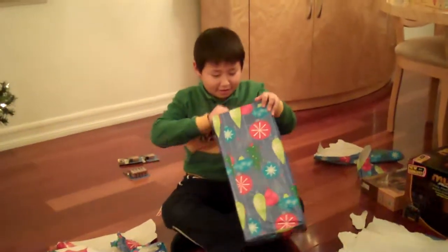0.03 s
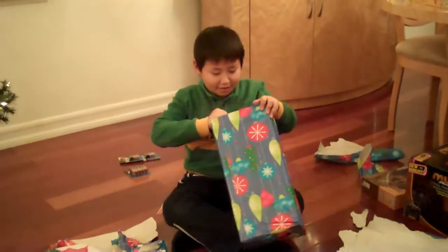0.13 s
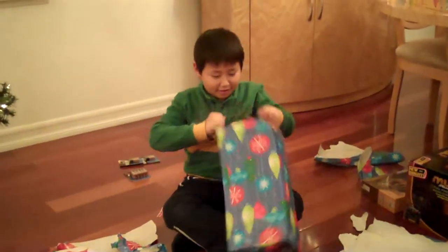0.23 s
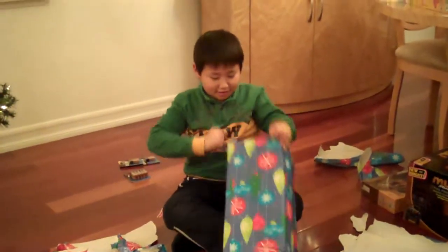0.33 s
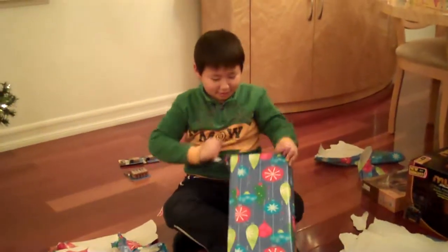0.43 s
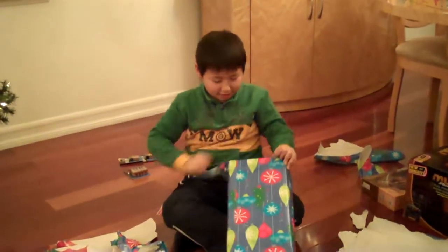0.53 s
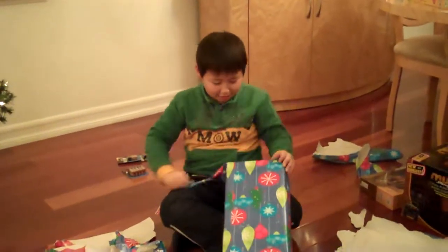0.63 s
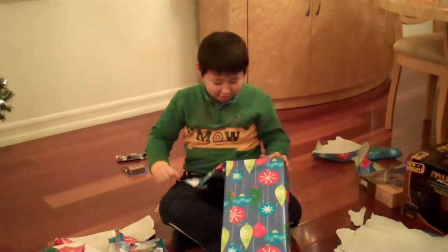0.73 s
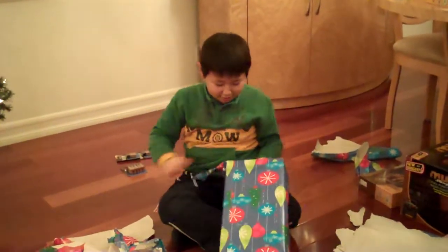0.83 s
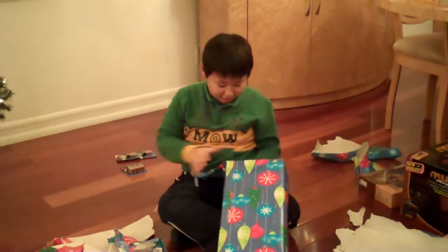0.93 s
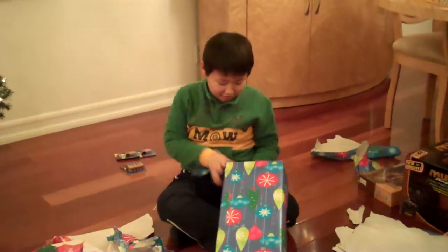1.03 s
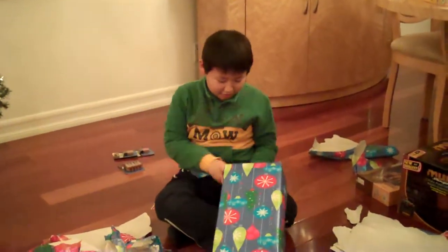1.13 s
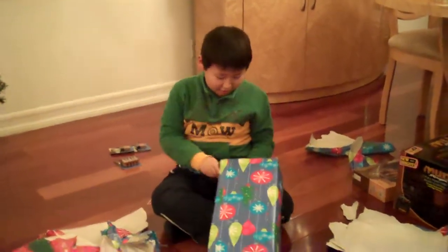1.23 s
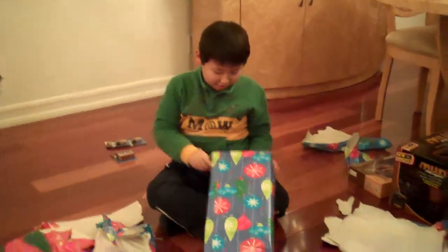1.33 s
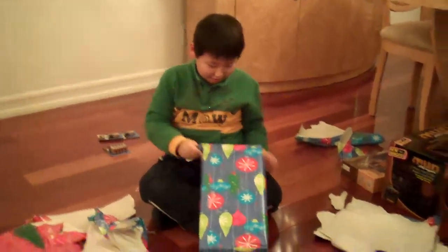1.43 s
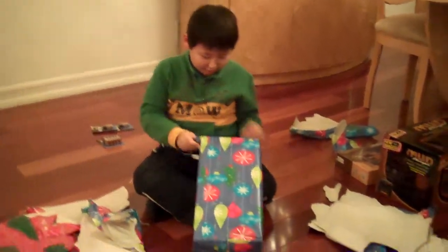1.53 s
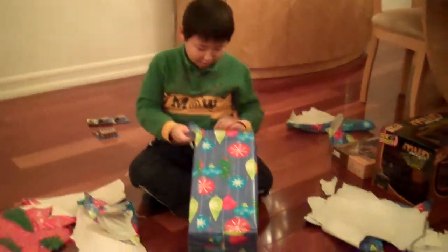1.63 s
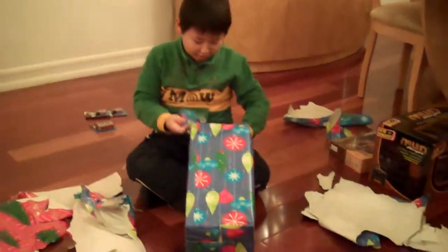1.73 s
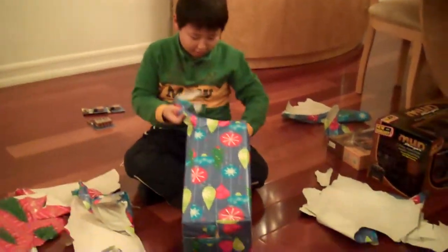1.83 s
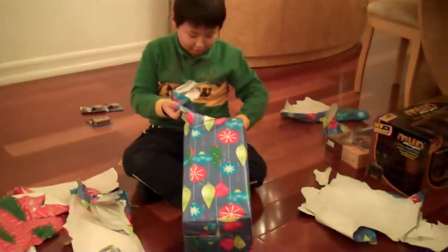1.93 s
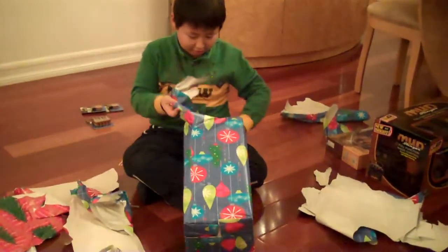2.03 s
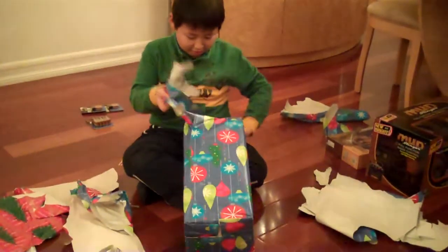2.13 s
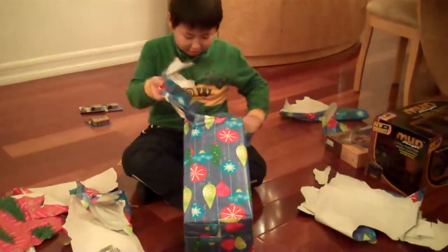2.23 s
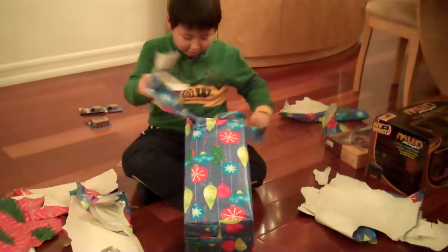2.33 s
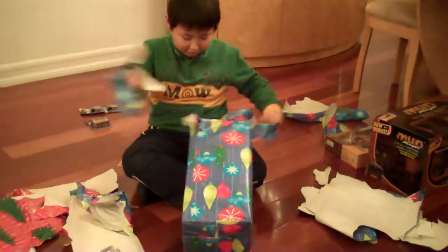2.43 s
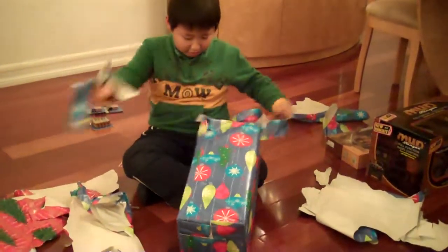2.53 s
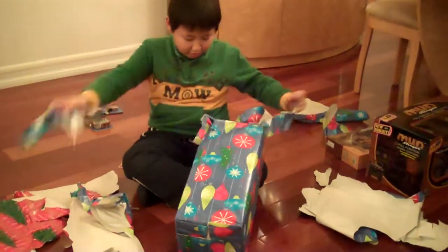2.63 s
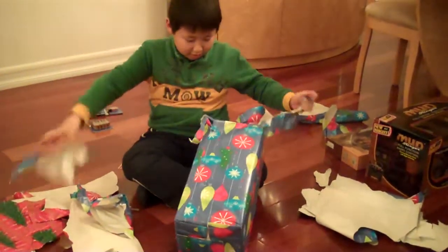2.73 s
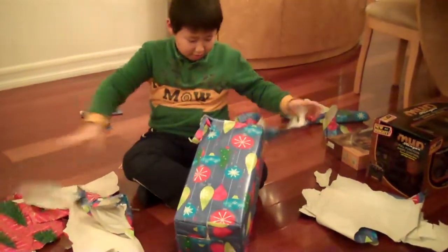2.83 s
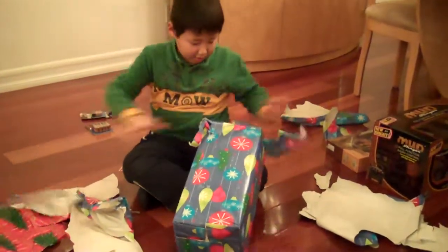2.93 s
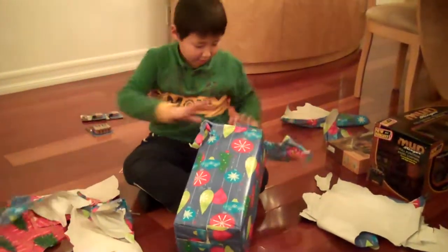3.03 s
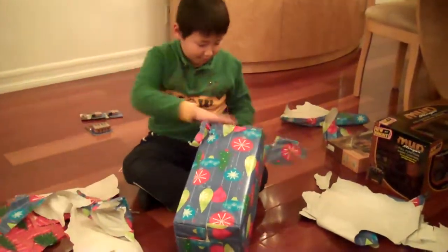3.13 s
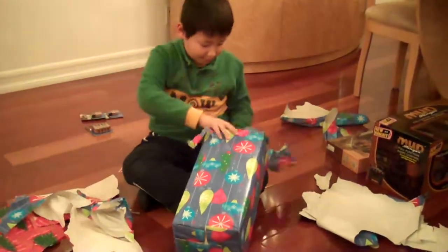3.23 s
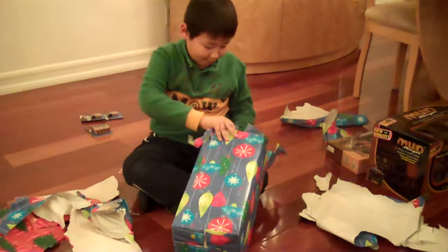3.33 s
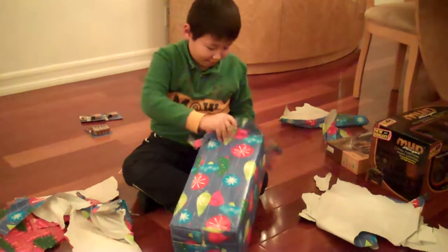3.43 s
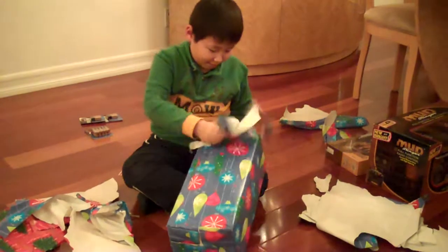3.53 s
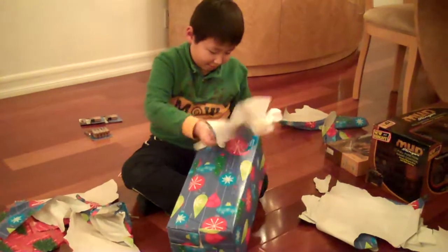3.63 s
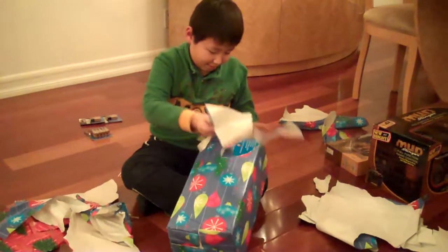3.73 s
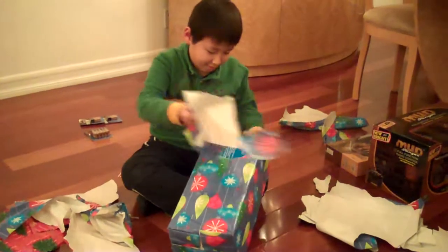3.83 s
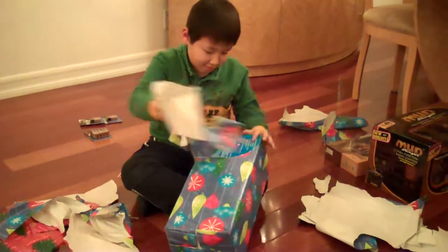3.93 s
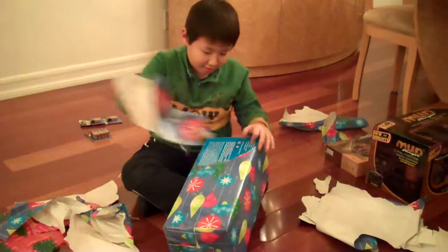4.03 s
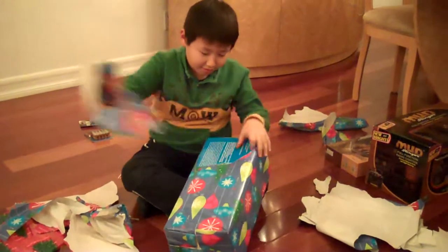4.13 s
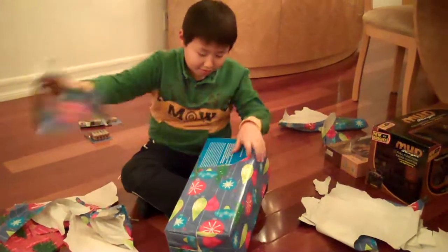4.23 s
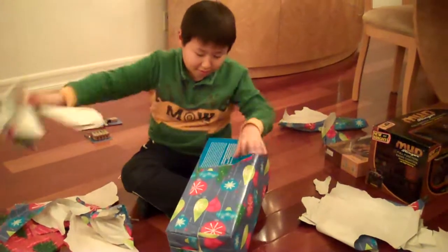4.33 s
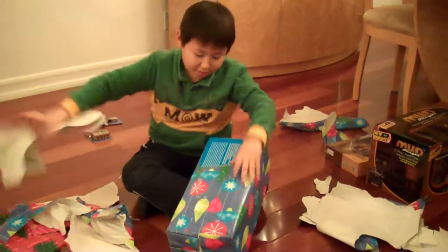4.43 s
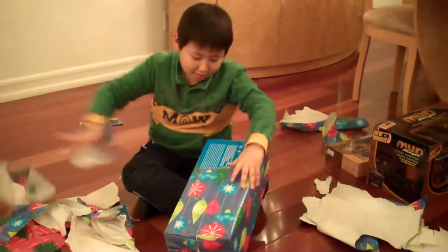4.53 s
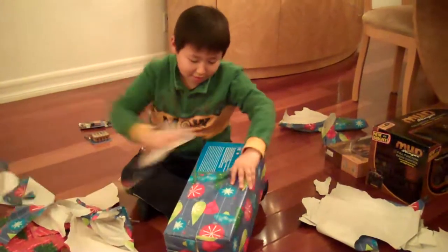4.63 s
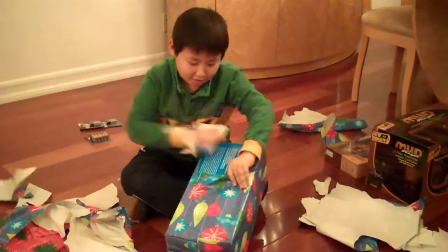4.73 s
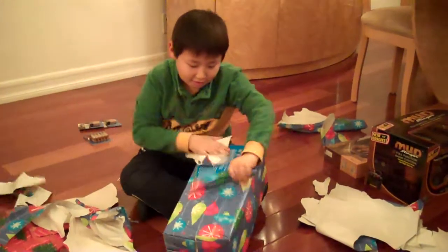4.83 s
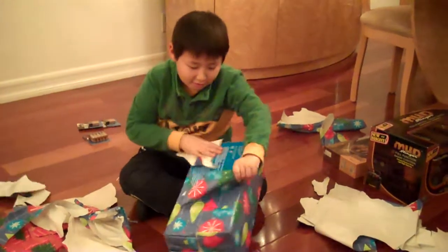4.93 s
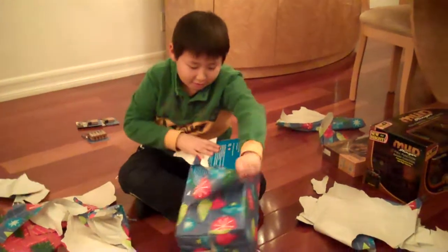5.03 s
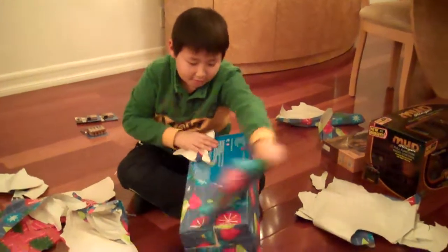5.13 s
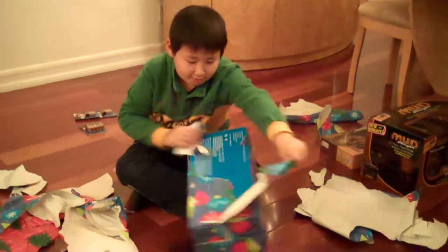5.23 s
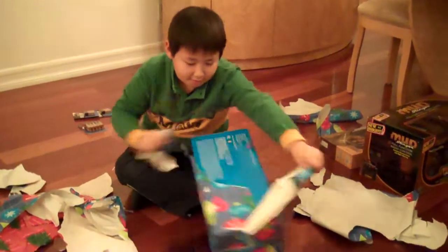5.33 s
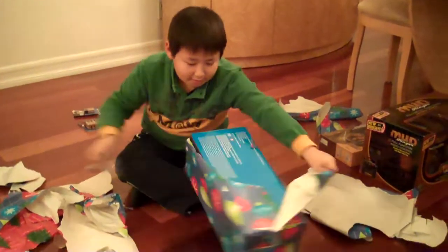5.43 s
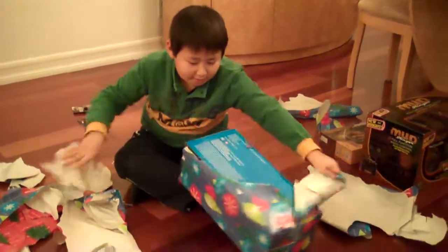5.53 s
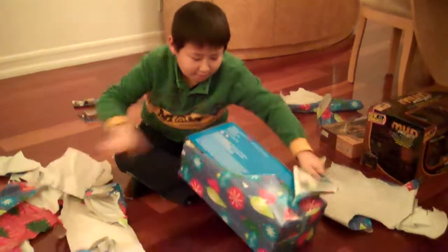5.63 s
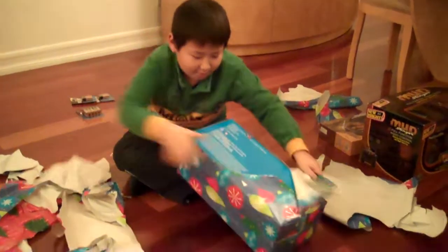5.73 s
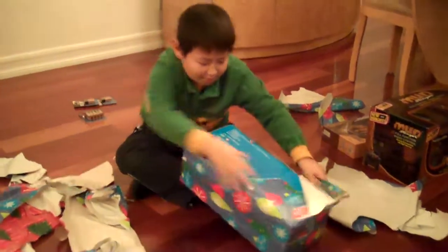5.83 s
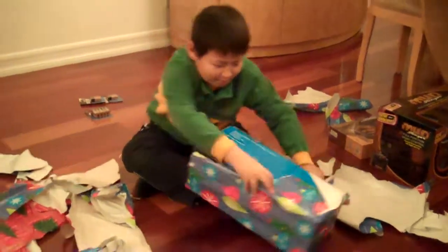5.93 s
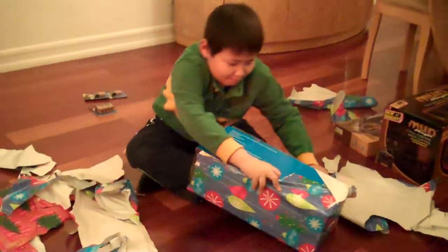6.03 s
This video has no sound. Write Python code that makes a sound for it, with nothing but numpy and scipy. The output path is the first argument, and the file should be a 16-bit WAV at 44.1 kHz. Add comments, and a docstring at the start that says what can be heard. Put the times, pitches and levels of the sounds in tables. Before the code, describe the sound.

Gift wrap is ripped off a cardboard box in sharp, crackling bursts, with paper crumpling and hollow box knocks in a room.

```python
"""In a room with a wooden floor, gift paper is torn off a cardboard box and crumpled by hand.
Tearing fibres are dense random impulses; creases and snaps are damped sines, the snaps with noisy bursts.
Rubbing and knocks excite resonances of the box, and knocks also thud into the boards.
A floor echo and decaying noise tails make the room; two microphone ports ring in the treble,
then quiet air is added and the recorder clips softly."""
import sys
import numpy as np
from scipy import signal
from scipy.fft import rfft, irfft, next_fast_len
from scipy.io import wavfile
from scipy.ndimage import map_coordinates

SR = 44100
rng = np.random.default_rng(int(sys.argv[2]) if len(sys.argv) > 2 else 0)


def transcribe(signal):
    """Save signal, clipped to [-1, 1], as a 16-bit WAV file at the path in sys.argv[1]."""
    frames = np.atleast_2d(signal).T
    limited = np.clip(frames, -1, 1)
    pcm = np.round(limited * 32767).astype(np.int16)
    wavfile.write(sys.argv[1], SR, pcm)


def boost(x):
    """Linear amplitude factor 10**(x/20) for a level x in decibels (scalar or array-like)."""
    u = np.asarray(x, float) / 20
    return 10 ** u


N = 268657  # samples

# spectral colour of parting fibres: f/Hz, relative level/dB
FIBRE_COLOUR = [(300, -68), (1500, -9.5), (3000, 3.5), (5000, 1.5), (8000, 3), (14000, 3)]


def along(points, hz):
    """Interpolation on a logarithmic frequency axis, between points of f/Hz and value."""
    f, v = np.transpose(points)
    return np.interp(np.log(hz + 1), np.log(f + 1), v)


def unit(x):
    """Normalisation of mean power: the rms becomes 1."""
    return x / np.sqrt(np.mean(x ** 2) + 1e-20)


def filtered(x, response):
    """Linear filtering: the spectrum is multiplied by a complex response of frequency."""
    m = next_fast_len(x.shape[-1] + 8192)
    spectrum = rfft(x, m) * response(np.fft.rfftfreq(m, 1 / SR))
    return irfft(spectrum, m)[..., :x.shape[-1]]


def causal(points):
    """Minimum phase: folding the cepstrum gives a short impulse response without pre-ring."""
    cepstrum = irfft(np.log(boost(along(points, np.fft.rfftfreq(2048, 1 / SR)))))
    folded = np.r_[cepstrum[0], 2 * cepstrum[1:1024], np.zeros(1024)]
    return irfft(np.exp(rfft(folded)))[:1024]


def wobble(rate):
    """Slow random modulation: a smooth curve through Gaussian knots, rate of them a second."""
    return map_coordinates(rng.standard_normal(N // 100), [np.arange(N) * rate / SR])


def ticks(count, spread_db, clump_db, clump_rate, scatter_db):
    """Crackling noise: clumped impulses, few large and many small, facing each port differently; rms 1."""
    when, size, sign = rng.random((count, 3)).T
    tail = np.minimum(-np.log(size + 1e-9), 5)  # the size is bounded, so that no single tick stands out
    size = boost(spread_db * tail) * np.sign(sign - .5)
    facing = boost(scatter_db * rng.standard_normal((2, count)))
    start = (when * N).astype(int)
    trains = np.array([np.bincount(start, size * f, N) for f in facing])
    return unit(trains * boost(clump_db * wobble(clump_rate)))


def coloured(train, points):
    """Convolution of impulses with a unit-energy kernel, which keeps the rms of random ticks."""
    kernel = causal(points)
    kernel = kernel / np.linalg.norm(kernel)
    return signal.fftconvolve(np.atleast_2d(train), kernel[None], axes=1)[:, :N]


def grains(start, size, hz, cycles):
    """Free decay of small resonators: damped sines summed, each falling by 1/e in the given cycles."""
    t = np.arange(128) / SR
    decay = np.exp(-hz[:, None] * t / cycles)
    rows = size[:, None] * np.sin(2 * np.pi * hz[:, None] * t) * decay
    return np.bincount((start[:, None] + np.arange(128)).ravel(), rows.ravel(), N + 128)[:N]


def handling(index):
    """Continuous excitation by hands that never quite rest: one column, a value per sample."""
    # t/s, relative loose rustle level/dB, creases over tearing/dB, relative box rubbing level/dB
    hands = [(0, -33.5, -9, -22.5), (.3, -32, -5, -25), (.47, -30, -2.5, -11.5), (.7, -31, -16, -22.5),
             (.88, -57, -16, -47), (1.04, -42.5, -6, -22.5), (1.22, -32, -0.5, -15),
             (1.52, -30, -9.5, -25.5), (1.75, -32, -7, -27), (2.12, -22, -9, -22), (2.4, -29, -9.5, -22.5),
             (2.72, -35.5, -1, -29), (2.89, -37, -15, -16.5), (3.0, -58, -10, -26), (3.074, -67, -18, -42),
             (3.086, -39.5, -1, -20), (3.42, -32.5, -3, -22), (3.7, -41, -6.5, -30.5), (4.03, -33, -7, -23),
             (4.42, -40.5, -2, -32), (4.6, -38.5, -6, -17), (4.9, -20, -7, -23), (5.2, -48, -8.5, -27),
             (5.41, -35, -2, -12.5), (5.74, -35, -5, -26), (5.86, -35, -4.5, -22), (6.09, -37, -2.5, -15)]
    columns = np.transpose(hands)
    return np.interp(np.arange(N) / SR, columns[0], columns[index])


def tearing():
    """Addition of incoherent powers: pulls and loose rustle give a relative tearing level in dB."""
    # pulls that swell, hold and let go: start t/s, rise t/s, hold t/s, fall t/s, relative level/dB
    pulls = [(-.03, 0.02, 0.0093, 0.22, -22.5), (0.167, 0.068, 0.035, 0.074, -23),
             (0.253, 0.065, 0.0055, 0.038, -12), (0.416, 0.023, .01, .06, -31.5),
             (0.548, 0.071, .005, 0.049, -19.5), (0.942, 0.021, 0.0093, .03, -35),
             (1.058, 0.026, .005, 0.14, -24), (1.234, .012, 0.038, 0.33, -24),
             (1.377, 0.013, 0.026, 0.15, -17), (1.576, 0.14, 0.13, 0.12, -19),
             (1.896, 0.045, 0.24, 0.064, -24), (2.083, 0.055, 0.0042, 0.12, -12),
             (2.231, 0.029, 0.092, 0.045, -18), (2.47, 0.049, .005, 0.43, -24.5),
             (2.625, 0.03, .005, 0.093, -19.5), (3.098, 0.083, .005, 0.34, -29.5),
             (3.433, 0.007, 0.29, 0.072, -20), (3.481, 0.0059, 0.013, 0.1, -9),
             (3.6, 0.013, .08, .04, -16.5), (3.751, 0.014, 0.248, .015, -19),
             (3.935, .02, 0.056, 0.012, -23.5), (4.448, .004, 0.0075, 0.0064, -26.5),
             (4.562, 0.026, 0.14, .02, -27.5), (4.775, 0.017, 0.069, .05, -15.5),
             (4.912, 0.14, 0.0043, 0.24, -14), (5.12, 0.029, .005, 0.076, -13),
             (5.245, 0.037, 0.0042, 0.089, -24), (5.398, 0.0071, 0.0059, 0.018, -28),
             (5.875, 0.0042, 0.023, 0.013, -20.5), (5.925, 0.044, .02, 0.17, -25.5),
             (6.04, 0.054, .05, .1, -29)]
    rise_db, fall_db = 17.5, 27  # covered in the rise and in the fall; the slopes continue beyond
    t = np.arange(0, N, 32) / SR
    power = boost(2 * handling(index=1)[::32])
    for start, *stages, db in pulls:
        rise, hold, fall = np.maximum(stages, .002)
        growth = rise_db * (t - start - rise) / rise
        release = fall_db * (start + rise + hold - t) / fall
        swell_db = np.minimum(growth, release)
        power = power + boost(2 * (db + np.clip(swell_db, -120, 0)))
    return np.interp(np.arange(N) / SR, t, 10 * np.log10(power))


def fibres(tear_db):
    """Brittle fracture as a dense impulse process: tearing fibres tick along the rip."""
    train = ticks(count=22000, spread_db=0.5, clump_db=2.0, clump_rate=90, scatter_db=3.0)
    return coloured(boost(tear_db - 11.5) * train, FIBRE_COLOUR)


def creases(tear_db):
    """Buckling: each small paper panel pops through its fold at its own pitch; the pops carry little below a
    few hundred hertz."""
    when, size = rng.random((15000, 2)).T
    start = (when * N).astype(int)
    level_db = tear_db + handling(index=2) - 11.5 + 2.57 * wobble(80)
    taut = boost(0.11 * (tear_db[start] + 28))  # harder pulling tightens the panels
    hz = np.clip(3300 * taut * np.exp(0.4 * rng.standard_normal(len(when))), 600, 9000)
    size_db = 3.33 * np.minimum(-np.log(size + 1e-9), 4)
    pops = grains(start, boost(level_db[start] + size_db), hz, cycles=0.9)
    return filtered(pops, lambda f: (1j * f / (1j * f + 450)) ** 2)


def cardboard(hz, upper):
    """Modal superposition: second-order box resonances of alternating sign, above or below 500 Hz."""
    # cardboard box modes: f/Hz, bandwidth f/Hz, relative level/dB
    modes = [(105, 31, -10.5), (223, 39.5, 0.5), (336, 100, -3.5), (548, 100, -3.5), (812, 92, -2),
             (1130, 1300, -10.5)]
    response = 0
    for k, (centre, width, db) in enumerate(modes):
        if (centre > 500) == upper:
            damping = 1j * hz * width
            response = response + (-1) ** k * boost(db) * damping / (centre ** 2 - hz * hz + damping)
    return response


def box(tear_db):
    """Forced and struck resonance: rubbing and knocks excite the box, and knocks thud into the floorboards."""
    # knocks: t/s, relative level/dB, upper modes relative level/dB, floor thud relative level/dB
    knocks = [(0.31, -23, -16, -20), (0.605, -26, 10, -33), (1.097, -42, 15, -24), (1.722, -21.5, 0.5, -28),
              (1.959, -40, 12, -25), (2.872, -32.5, 8, -33), (3.186, -29, -6, -13), (3.353, -27, 1, -16),
              (4.576, -35, 19, -32), (4.803, -31, 3, 0), (5.41, -17, 0, -11.5), (5.49, -22.5, 4, -19),
              (5.918, -23.5, -4, -14), (5.986, -27, 21.5, -36)]
    # a knocked box slides and chatters on for a moment
    shudder_db, shudder_upper_db, shudder_t60_s = -4, -10.5, 0.47
    rub_follows, rub_offset_db = 0.7, -8.5  # dB of rubbing per dB of tearing; relative level
    rub_db = handling(index=3) + rub_follows * tear_db + rub_offset_db
    rub = boost(rub_db) * ticks(count=6000, spread_db=2.2, clump_db=3.3, clump_rate=26, scatter_db=1.0)
    low, high, thud = np.zeros((3, N))
    fading = boost(-60 * np.arange(SR // 3) / SR / shudder_t60_s)
    chatter = fading * rng.standard_normal((len(knocks), SR // 3))
    for (s, db, upper_db, thud_db), after in zip(knocks, chatter):
        start = round(s * SR)
        after = after[:N - start]
        low[start:][:len(after)] += boost(db + shudder_db) * after
        high[start:][:len(after)] += boost(db + upper_db / 2 + shudder_upper_db) * after
        # the blow itself is one impulse
        low[start] = boost(db + 23)
        high[start] = boost(db + upper_db + 22.0)
        thud[start] = boost(db + thud_db + 38.5)
    boards = lambda hz: 1j * hz * 70 / (105 ** 2 - hz * hz + 1j * hz * 70)
    lower_box = filtered(low + boost(11) * rub, lambda hz: cardboard(hz, False))
    upper_box = filtered(high + boost(13.0) * rub, lambda hz: cardboard(hz, True))
    return lower_box + upper_box + filtered(thud, boards)


def small_snaps(tear_db, count):
    """Random release of strain: lesser snaps at random times, as strong as the tearing makes them."""
    over_tearing_db, spread_db = 10, 2.5
    median_hz, panel_db, pan_spread_db = 4700, -13, 3.5
    when, chance = rng.random(count) * N, rng.standard_normal((count, 3)).T
    db = tear_db[when.astype(int)] + over_tearing_db + spread_db * chance[0]
    hz = np.clip(median_hz * np.exp(0.16 * chance[1]), 1500, 6000)
    return np.transpose([when / SR, db, hz, np.full(count, panel_db), pan_spread_db * chance[2]])


def snaps(tear_db):
    """Snap-through: a crease lets go in a dying burst of ticks, and the panel beside it swings once or twice."""
    # loud snaps: t/s, relative peak level/dB, panel f/Hz, panel relative level/dB, left over right level/dB
    loud_snaps = [(.1022, -11, 4800, -17, 2), (.163, -9, 5630, -16, -2), (.201, -9, 5360, -20, 2),
                  (.251, 0, 5030, -22, 10), (.3187, -8, 5200, -3, 7), (.5067, -11.5, 5100, -14, -2),
                  (.5536, -3, 5300, -19, -2), (.565, -5, 5200, -20, 0), (.636, -11, 5300, -18, 0),
                  (.7532, -11.5, 5530, -10, 2), (.915, -23, 4470, -12, 2), (1.0864, -6.5, 4500, -22, 4),
                  (1.3014, -9, 2980, -21, 9), (1.3425, -9, 4480, -24, 4), (1.3897, -7, 5230, -2, 0),
                  (1.3983, 0, 5100, -13, 10), (1.701, -1, 4400, -25, 10), (1.7164, -6, 5440, -26, 9),
                  (1.741, -8, 4260, -18, 2), (1.783, -6, 5070, -17, 0), (1.9615, -3, 4540, -9, -1),
                  (2.017, -3.5, 4620, -14, 3), (2.1206, -5, 5350, -9, 0), (2.243, -8, 5270, -21, 0),
                  (2.2623, -7.5, 2230, -4.5, 0), (2.279, -4, 5100, -27, 9), (2.3034, 4, 3350, -21, 6),
                  (2.3244, 5, 5320, -33, 4), (2.36, -2, 2060, -27, 14), (2.499, -11, 2800, -14, -2),
                  (2.642, -11, 5040, -13, 4), (2.7197, -9, 3260, -19, 4), (2.7942, 0.5, 5660, -45, 2),
                  (3.0835, -25, 4320, -7, -8), (3.0986, -19, 4340, -12, -4), (3.168, -9, 2760, -13, -3),
                  (3.1887, -8, 5390, -14, 0), (3.1946, -8, 2390, -11, 0), (3.2136, -6, 5500, -17, -7),
                  (3.2274, 0.5, 2300, -17, 1), (3.245, -2.5, 4460, -9, 2), (3.26, -2, 5500, -22, 0),
                  (3.2787, 0, 5500, -31, -5), (3.3822, -6, 4620, -32, -8), (3.4391, 0.5, 2070, -18, -1),
                  (3.491, -6, 4430, -24, 0), (3.5534, -7, 4150, -10, -2), (3.7713, -17, 5200, -19, -9),
                  (3.9115, -8, 4980, -19, 0), (3.9497, 2, 5000, -13, -2), (3.967, 1, 4460, -8, -4),
                  (4.011, -4, 4830, -7, -2), (4.2785, -1, 2900, -10.5, -0.5), (4.283, -18, 4430, -6, -2),
                  (4.358, -17, 3200, -7.5, 3), (4.4495, -14, 5380, -12, 0), (4.5417, -7.5, 5430, -28, -1),
                  (4.551, -15, 5000, -20, 3), (4.5766, -1, 4420, -15, 7), (4.583, 1, 2970, -14.5, -1),
                  (4.6448, 4.5, 5120, -37, -2), (4.6511, -9, 5470, 1, 5), (4.6835, 0.5, 5430, -22, -5),
                  (4.7207, -1, 4080, -28, 0), (4.7502, -4.5, 2470, -9.5, 0), (4.788, -6, 5200, -20, 7),
                  (4.8142, 7, 5270, -19, 6), (4.846, -2, 5160, -22, 0), (4.855, 8, 4520, -31, -4),
                  (5.0569, -10, 4750, -21, 8), (5.2813, -18, 3160, -4, 5), (5.408, -6, 4430, -22, 0),
                  (5.4909, -10, 4960, -25, 2), (5.5063, 0, 4330, -16, 3), (5.5248, -10, 4550, -12, 4),
                  (5.54, -9, 4200, -15, -4), (5.6441, -6.5, 4800, -11, 2), (5.7763, -14.5, 4160, -4, 0),
                  (5.7997, -8, 2880, -11, 0), (5.876, -9, 4720, -8, 6), (5.89, -2.5, 4400, -8, -4),
                  (5.905, -7, 4460, -9, -2), (5.943, -7, 5070, -15, 0), (5.9783, -6, 5020, -17, 8),
                  (5.9835, 4, 5800, -16, -9), (6.0028, -6, 4760, -11, 2)]
    crackle_t60_s = 0.022
    s, db, hz, panel_db, pan_db = np.r_[loud_snaps, small_snaps(tear_db, count=70)].T
    start, t = np.round(s * SR).astype(int), np.arange(900)
    fading = np.tile(boost(-60 * t / SR / crackle_t60_s), (len(s), 1))
    sparse = rng.random(fading.shape) < .15
    burst = 0.57 * fading * rng.standard_normal(fading.shape) * sparse
    burst[:, 0] = 1  # the first tick
    positions = (start[:, None] + t).ravel()
    out = []
    for side in (boost(pan_db / 2), boost(-pan_db / 2)):
        sized = burst * (side * boost(db - 11))[:, None]
        train = np.bincount(positions, sized.ravel(), N + SR)[:N]
        panel = grains(start, side * boost(db + panel_db - 4), hz, cycles=2.2)
        out.append(coloured(train, FIBRE_COLOUR)[0] + panel)
    return filtered(np.array(out), lambda f: (1j * f / (1j * f + 700)) ** 2)


def floor_echo(x):
    """Specular reflection: the boards return a copy a millisecond later, with a separate delay to each port."""
    lag = np.array([[.00095], [.00105]])  # s
    return filtered(x, lambda hz: 1 + 0.065 * np.exp(-2j * np.pi * hz * lag))


def pair(noise):
    """Spatial coherence of a diffuse field: two noises mixed to a given likeness at the ports."""
    # likeness at the two ports: f/Hz, correlation (0-1)
    alike = [(60, 0), (200, 0.97), (700, 0.91), (2000, 0.69), (4000, 0), (8000, 0)]
    turn = lambda hz: np.arccos(np.clip(along(alike, hz), 0, 1)) / 2
    mid, side = filtered(noise, lambda hz: np.array([np.cos(turn(hz)), np.sin(turn(hz))]))
    return np.array([mid + side, mid - side])


def room(x):
    """Reverberation as decaying noise, drawn afresh 24 times a second so that no fixed tone rings through."""
    # reverberation time: f/Hz, t60 t/s
    decay = [(150, 0.35), (1000, 1), (4000, 0.46), (8000, 0.25), (14000, 0.25)]
    step, out = SR // 24, np.zeros((2, N + 2 * SR))
    for start in range(0, N, step):
        hz, t, z = signal.stft(pair(rng.standard_normal((2, SR // 2))), SR, nperseg=256)
        fading = boost(-60 * t / along(decay, hz)[:, None])
        tail = signal.istft(z * fading, SR, nperseg=256)[1]
        wet = signal.fftconvolve(x[None, start:start + step], tail / np.linalg.norm(tail[0]), axes=1)
        out[:, start + 200:][:, :wet.shape[1]] += wet  # the tail begins 200 samples late
    return out[:, :N]


def quiet_air():
    """Stationary diffuse noise: coloured room air, partly alike at the two ports; rms 1."""
    # f/Hz, relative spectral density level/dB
    air_colour = [(18, -63), (30, -23), (70, -24), (201, -20.5), (260, -17.5), (806, -19.5), (1130, -19),
                  (1310, -22.5), (7750, -13), (14000, -49)]
    noise = pair(rng.standard_normal((2, N)))
    return unit(filtered(noise, lambda hz: boost(along(air_colour, hz))))


def microphone_ports(dry):
    """Cavity resonance: each port has its own treble peak, here a minimum-phase response."""
    # f/Hz, relative gain level/dB
    left_port = [(3000, 1.5), (6200, 10.5), (7600, 17.5), (8300, 12.5), (9600, 0.5), (11000, -4),
                 (14000, -6.5)]
    # f/Hz, relative gain level/dB
    right_port = [(3000, 1.5), (5500, 8), (6700, 13), (7600, 8), (8300, -2), (10300, -13), (12400, -22.5),
                  (14000, -43.5)]
    ports = np.array([causal(left_port), causal(right_port)])
    return signal.fftconvolve(dry, ports, axes=1)[:, :N]


def scene():
    """Superposition of direct sound, floor echo and room; snaps beam forward and wake the room less."""
    tear_db = tearing()
    rustle = fibres(tear_db) + creases(tear_db) + box(tear_db)
    snap = snaps(tear_db)
    beamed = boost(-4) * snap
    return floor_echo(rustle + snap) + boost(-5) * room((rustle + beamed).mean(axis=0))


def roll_off(x):
    """The treble ends steeply here."""
    return signal.sosfilt(signal.butter(12, 15540, fs=SR, output="sos"), x)


def record(dry):
    """Transduction and saturation: ports, a bass cut, quiet air, soft clipping and a band limit."""
    x = microphone_ports(dry)
    lag = np.array([[.00003], [0]])  # s; a small delay of the left port against the right
    bass_cut = lambda hz: (1j * hz / (1j * hz + 80)) ** 3
    x = filtered(boost(7.0) * x, lambda hz: bass_cut(hz) * np.exp(-2j * np.pi * hz * lag))
    x = x + boost(-43.5) * quiet_air()
    x = x / (1 + np.abs(x / .95) ** 5) ** (1 / 5)  # soft clipping towards .95
    top_hz = 14200
    x = filtered(x, lambda hz: np.where(hz < top_hz, 1, boost(-38)))
    return roll_off(x)


dry = scene()
out = record(dry)
transcribe(out)
```